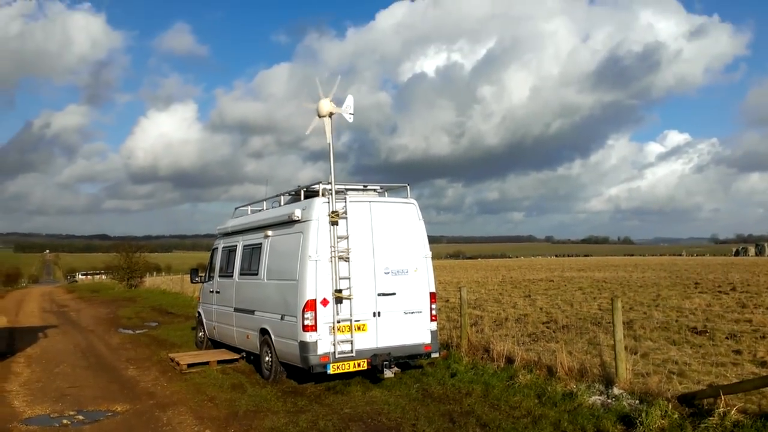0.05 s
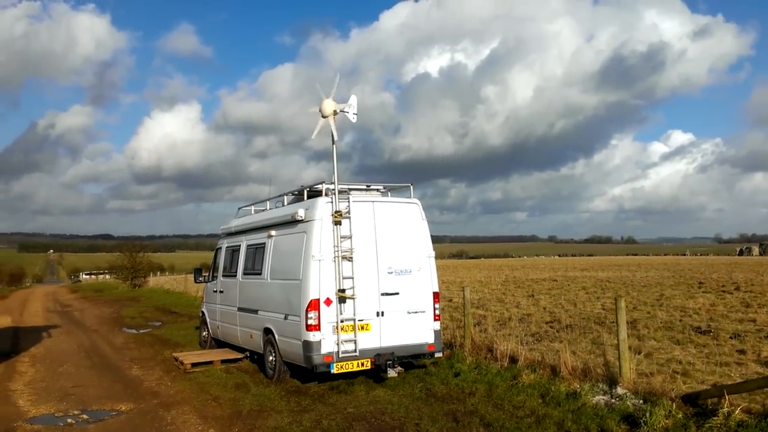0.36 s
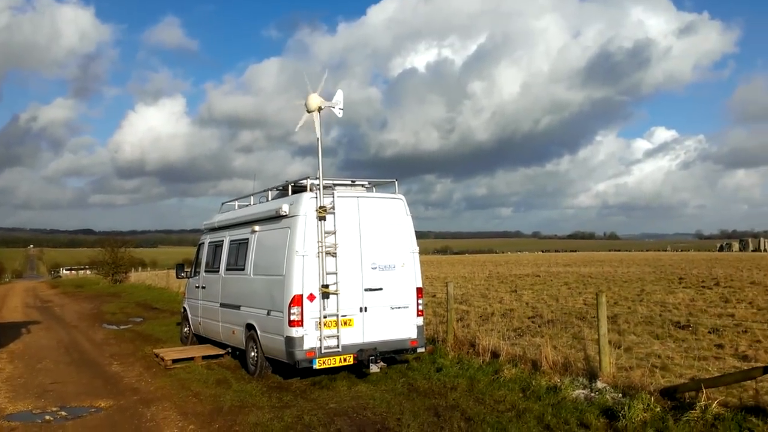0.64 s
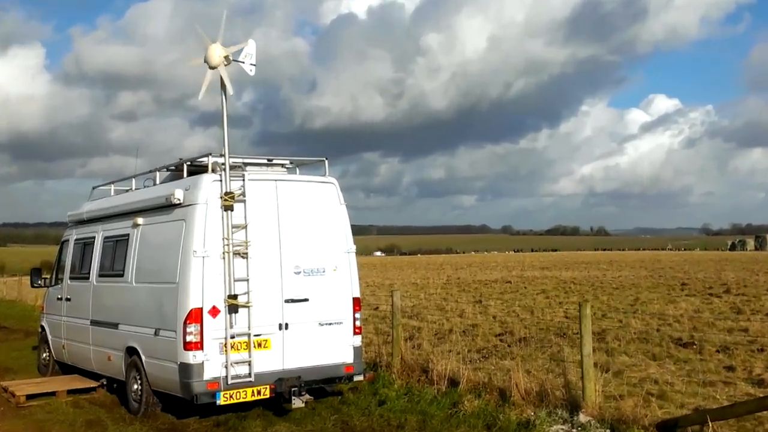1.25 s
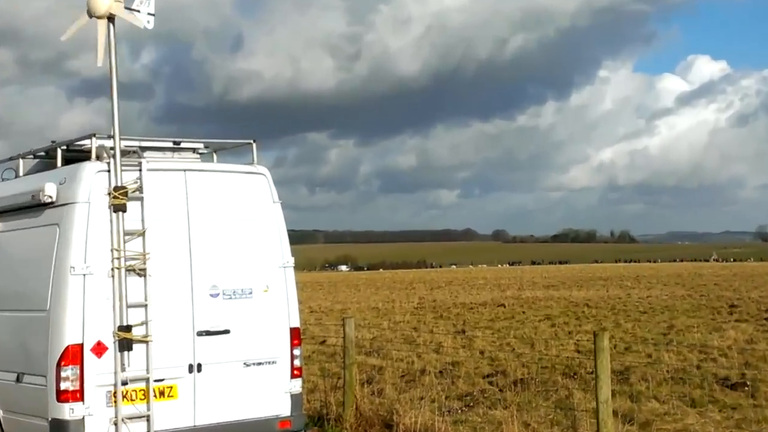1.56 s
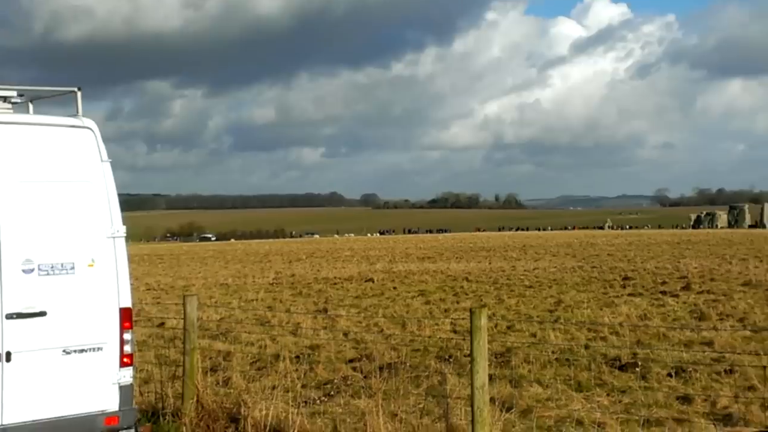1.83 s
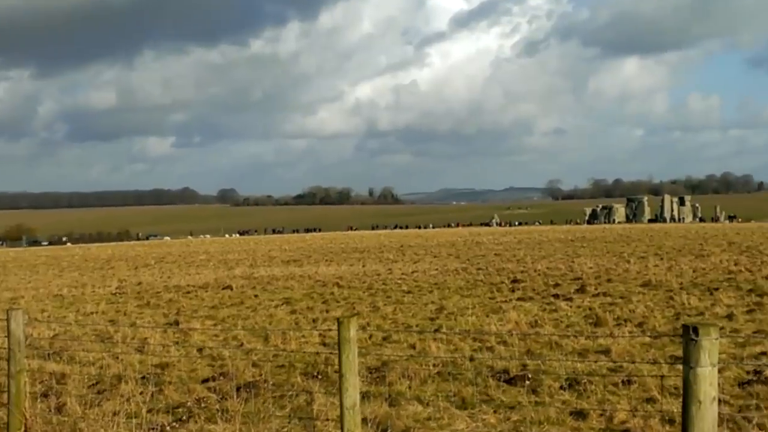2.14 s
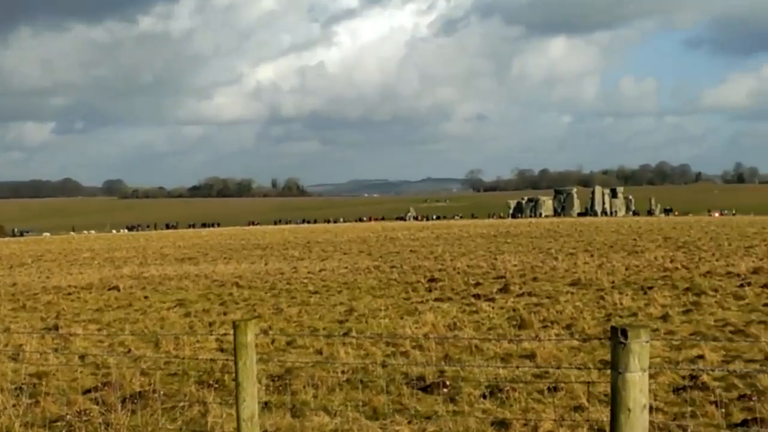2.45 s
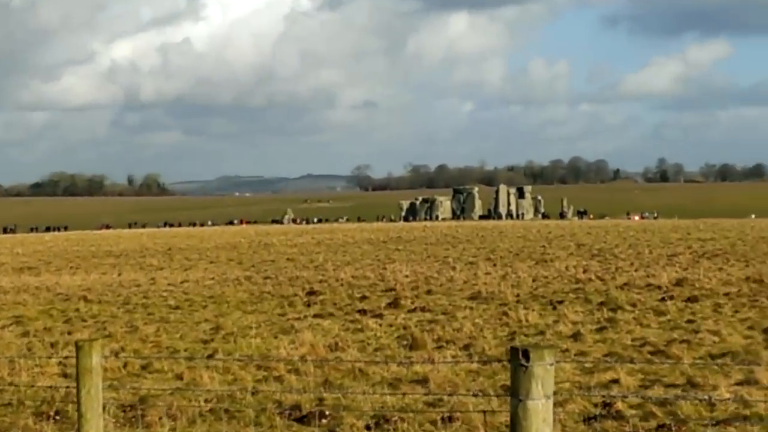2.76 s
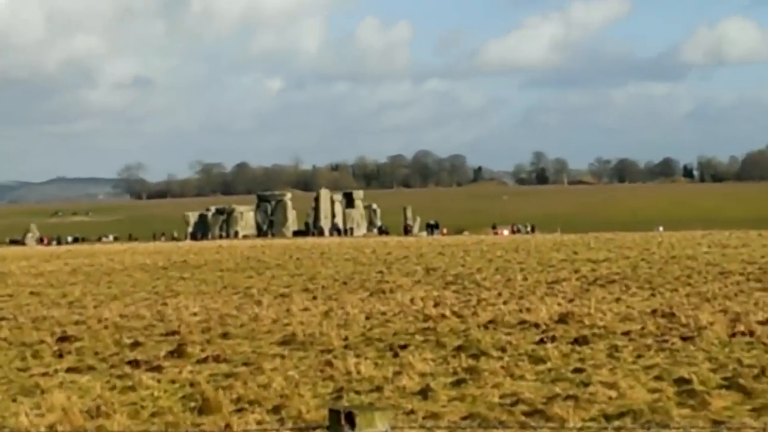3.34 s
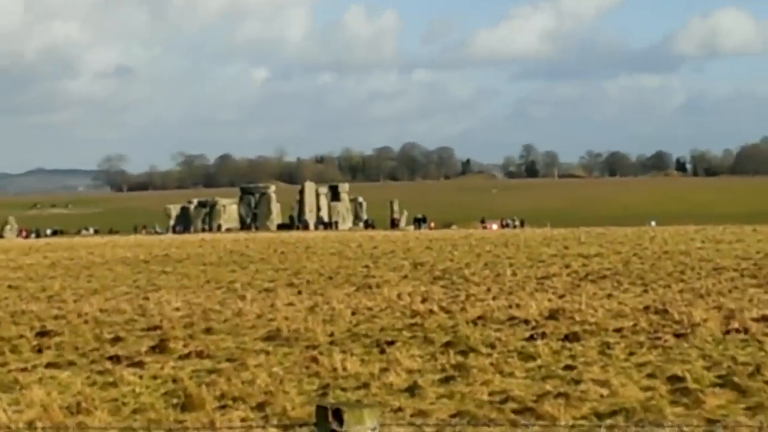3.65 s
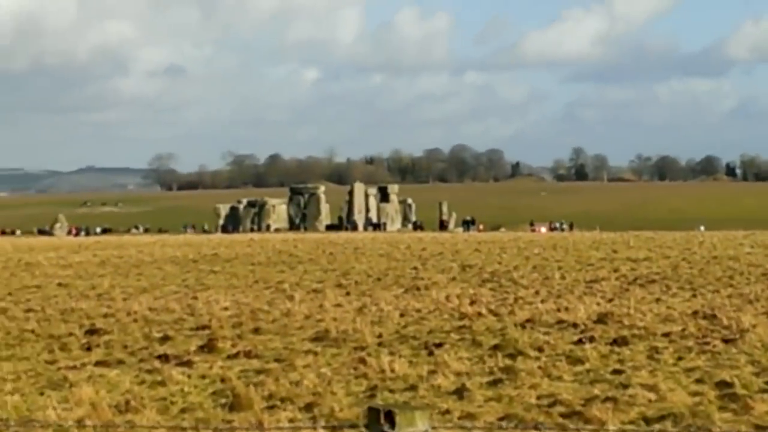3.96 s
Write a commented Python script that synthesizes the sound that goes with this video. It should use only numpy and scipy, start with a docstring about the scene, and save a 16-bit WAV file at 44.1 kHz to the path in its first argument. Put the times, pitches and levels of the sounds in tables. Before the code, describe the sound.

Wind rumbles and pops on the microphone outdoors, blowing steadily at first, then in short harsh gusts with lulls between. A soft rush of air and light ticks from the hand-held camera lie underneath.

```python
"""Gusty wind buffets the microphone of a hand-held camera in an open field.
Eddies flutter over the port; the harder they blow, the brighter and harsher they sound, until
the capsule overloads. Single large eddies pop on the port, and dull thuds underlie hard gusts.
Air rushes, dry grass rustles faintly, the casing ticks in the hand and fingers scrape on it.
The gain control ducks everything, hiss included, under the gusts."""
import sys
import numpy as np
from scipy import signal
from scipy.fft import rfft, irfft, next_fast_len
from scipy.io import wavfile
from scipy.ndimage import map_coordinates

SR = 44100
rng = np.random.default_rng(int(sys.argv[2]) if len(sys.argv) > 2 else 0)


def output_pcm(signal):
    """Save a mono or channel-first signal as 16-bit PCM at the path in sys.argv[1].

    Samples are clipped to [-1, 1] before scaling.
    """
    pcm = np.clip(np.atleast_2d(signal).T, -1, 1) * 32767
    wavfile.write(sys.argv[1], SR, np.round(pcm).astype(np.int16))


N = 176400


def amp(db):
    """Decibels to gain."""
    return 10 ** (np.asarray(db) / 20)


def unit_rms(x):
    """Scale to rms 1."""
    return x / np.sqrt(np.mean(x ** 2) + 1e-20)


def log_interp(points, hz):
    """Interpolate (frequency [Hz], value) points on a log axis."""
    knots_hz, values = np.transpose(points)
    return np.interp(np.log(hz + 1), np.log(knots_hz + 1), values)


def curve(points):
    """Interpolate (time [s], value) points at every sample."""
    return np.interp(np.arange(N) / SR, *np.transpose(points))


def wobble(rate_hz):
    """Smooth random curve, rate_hz knots a second."""
    return map_coordinates(rng.standard_normal(N // 10), [np.arange(N) * rate_hz / SR], mode="mirror")


def filtered(x, response):
    """Zero-phase filter of gain response(hz)."""
    size = next_fast_len(N + SR // 2)
    return irfft(rfft(x, size) * response(np.fft.rfftfreq(size, 1 / SR)), size)[:N]


def butterworth(x, hz, kind, order):
    """Causal low-pass or high-pass."""
    return signal.sosfilt(signal.butter(order, hz, kind, fs=SR, output="sos"), x)


def noise(spectrum):
    """Coloured noise of rms 1."""
    return unit_rms(filtered(rng.standard_normal(N), lambda hz: amp(log_interp(spectrum, hz))))


def running_rms(x, window_s):
    """Rms under a centred Gaussian window."""
    power = filtered(x ** 2, lambda hz: np.exp(-(hz * window_s) ** 2))
    return np.sqrt(np.abs(power) + 1e-12)


# wind between gusts (time [s], level [dB])
WIND_DB = [(0, -23), (.08, -24.5), (.17, -25), (.31, -27.5), (.42, -30), (.53, -25), (.65, -24.5),
           (.72, -25.5), (.84, -21), (.9, -22.5), (1.03, -20.5), (1.065, -27), (1.14, -20), (1.21, -24.5),
           (1.29, -33), (1.36, -34), (1.44, -40), (1.49, -30.5), (1.55, -40), (1.68, -29), (1.8, -29),
           (1.9, -30), (2.05, -32), (2.22, -28), (2.45, -26.5), (2.6, -29.5), (2.68, -40.5), (2.76, -43),
           (2.83, -22.5), (2.9, -26), (3.03, -23.5), (3.13, -30.5), (3.25, -40.5), (3.31, -32),
           (3.38, -50.5), (3.44, -30), (3.49, -49), (3.55, -37), (3.6, -57), (3.73, -44), (3.8, -34.5),
           (3.9, -30.5), (4, -34.5)]
# gusts on the port (start [s], length [s], level [dB])
PORT_GUSTS = [(0.129, 0.033, -23.5), (0.203, 0.006, -19.5), (0.287, 0.0087, -18), (0.346, 0.014, -21),
              (0.59, 0.012, -22), (0.828, 0.013, -14), (0.923, 0.026, -20.5), (0.991, 0.033, -21),
              (1.106, 0.015, -16), (1.194, 0.017, -18.5), (1.233, 0.0057, -23), (1.331, 0.017, -23.5),
              (1.403, 0.013, -26), (1.826, 0.013, -12.5), (1.854, 0.0084, -12), (1.87, 0.0232, -14),
              (2.16, 0.005, -25), (2.25, 0.014, -18), (2.339, 0.015, -24), (2.488, 0.008, -25),
              (2.775, 0.007, -24.5), (2.92, 0.0058, -13), (2.934, 0.012, -16), (2.951, 0.027, -13.5),
              (2.994, 0.011, -19.5), (3.063, 0.021, -23), (3.279, 0.018, -25.5), (3.333, 0.021, -26.5),
              (3.533, 0.014, -26), (3.675, 0.038, -31), (3.787, 0.0083, -25.5), (3.898, 0.023, -26.5)]
GUST_RISE_S, GUST_FALL_S = 0.0017, 0.0044
FLUTTER_DB, FLUTTER_HZ = 6, 84.6
SMALL_EDDY_DB, SMALL_EDDY_HZ = 3, 348.4


def flow_db():
    """Flow at the port: fluttering wind, gusts that rise, hold and fall, and small eddies."""
    t = np.arange(N) / SR
    power = amp(curve(WIND_DB) + FLUTTER_DB * np.tanh(wobble(FLUTTER_HZ))) ** 2
    for start_s, length_s, db in PORT_GUSTS:
        before = np.maximum(start_s - t, 0) / GUST_RISE_S
        after = np.maximum(t - start_s - length_s, 0) / GUST_FALL_S
        power += (amp(db) * np.exp(-np.minimum(before + after, 20))) ** 2
    return 10 * np.log10(power) + SMALL_EDDY_DB * np.tanh(wobble(SMALL_EDDY_HZ))


# turbulence at nominal flow (frequency [Hz], relative density [dB])
BUFFET_SPECTRUM = [(25, -37), (55, -7), (80, -2.5), (110, -3), (190, 0.5), (300, 1.5), (500, -2),
                   (700, -10.5), (1000, -20.5), (1500, -37.5), (2400, -50), (3200, -59.5), (6000, -57),
                   (16000, -100)]
# band growth with flow (centre [Hz], slope [dB/dB])
BAND_GROWTH = [(160, 0.84), (340, 0.98), (600, 1.1931), (1200, 2), (2400, 2.5)]
# lowest band's trim (time [s], gain [dB])
BASS_TRIM_DB = [(0, -4.5), (1.2, -2.5), (1.8, 0.5), (3.3, 3.5), (4, 0.5)]
NOMINAL_DB, CHOKE_ABOVE_NOMINAL_DB = -25, 18


def buffeting():
    """Turbulence whose upper bands grow fastest with the flow, until the port chokes."""
    eddies = noise(BUFFET_SPECTRUM)
    eddies /= running_rms(eddies, window_s=0.012)
    drive_db = np.minimum(flow_db() - NOMINAL_DB, CHOKE_ABOVE_NOMINAL_DB)
    centres_hz, slopes = np.transpose(BAND_GROWTH)
    bands = []
    for weights, slope in zip(np.eye(len(slopes)), slopes):
        band = filtered(eddies, lambda hz: log_interp(np.c_[centres_hz, weights], hz))
        bands.append(band * amp(NOMINAL_DB + slope * drive_db))
    return bands[0] * amp(curve(BASS_TRIM_DB)) + sum(bands[1:])


OVERLOAD_DB, ASYMMETRY = -3, 0.32
PORT_CUTOFF_HZ, BASS_CUT_HZ, BASS_LEAK_DB = 2900, 139, -19


def microphone(pressure):
    """The capsule saturates, yielding more one way; the narrow port muffles; most deep bass is shed."""
    swing = np.tanh(pressure / amp(OVERLOAD_DB))
    lopsided = amp(OVERLOAD_DB) * (swing + ASYMMETRY * swing ** 2)
    muffled = butterworth(lopsided, PORT_CUTOFF_HZ, "low", order=4)
    return butterworth(muffled, BASS_CUT_HZ, "high", order=3) + amp(BASS_LEAK_DB) * muffled


# airy rush (time [s], level [dB])
RUSH_DB = [(0, -45.5), (.2, -37.5), (.42, -52), (.65, -38.5), (.85, -33), (1.2, -43.5), (1.3, -53.5),
           (1.47, -48), (1.56, -55), (1.8, -47), (2.2, -58), (2.5, -51.5), (2.7, -55), (2.95, -42.5),
           (3.2, -57.5), (3.6, -58), (4, -57)]
# airy rush (frequency [Hz], relative density [dB])
RUSH_SPECTRUM = [(30, -11.5), (200, -6), (700, 9), (1400, 0), (2300, -12.5), (3000, -20), (5000, -32),
                 (16000, -67)]
RUSH_FLUTTER_DB = 0.6


def air_rush():
    """Air rushes past behind the buffeting."""
    return noise(RUSH_SPECTRUM) * amp(curve(RUSH_DB) - RUSH_FLUTTER_DB * wobble(rate_hz=47))


# rustle (time [s], level [dB])
GRASS_DB = [(0, -68), (.5, -61.5), (.9, -72.5), (1.3, -65.5), (1.47, -61), (1.62, -64.5), (2.3, -67),
            (2.7, -69), (3.3, -68.5), (3.6, -71.5), (3.72, -66), (4, -67.5)]
# rustle (frequency [Hz], relative density [dB])
GRASS_SPECTRUM = [(200, -7), (1500, 4.5), (2900, 5), (3600, 3), (4100, 3), (4600, 5), (5200, -1),
                  (6000, -14), (9000, -28), (16000, -35)]
GRASS_FLUTTER_DB = 3.5


def grass_rustle():
    """Dry grass flutters in the wind."""
    return noise(GRASS_SPECTRUM) * amp(curve(GRASS_DB) + GRASS_FLUTTER_DB * wobble(rate_hz=38))


# large eddies (time [s], envelope peak [dB], pitch [Hz])
EDDY_POPS = [(.03, -12.5, 570), (.047, -9, 476), (.133, -21, 520), (.265, -9, 570), (.29, -18.5, 970),
             (.353, -13, 563), (.391, -6, 510), (.49, -12.5, 600), (.559, -11.5, 583), (.595, -10.5, 540),
             (.676, -10, 457), (.759, -12, 600), (.82, -8, 540), (.841, -7.5, 1610), (.885, -10.5, 850),
             (.937, -8.5, 450), (.995, -9.5, 537), (1.026, -7.5, 607), (1.108, -11, 460),
             (1.12, -6.5, 1250), (1.174, -15, 460), (1.209, -20, 480), (1.234, -19.5, 600),
             (1.271, -18.5, 430), (1.336, -12.5, 490), (1.648, -13, 328), (1.715, -13.5, 400),
             (1.824, -4, 890), (1.837, -1, 1530), (1.887, -6.5, 990), (1.894, -7, 650), (1.914, -7.5, 447),
             (2.158, -16, 470), (2.248, -7.5, 530), (2.256, -18, 1100), (2.268, -4, 404),
             (2.298, -12.5, 550), (2.344, -9, 377), (2.419, -8.5, 544), (2.466, -13.5, 555),
             (2.56, -9.5, 543), (2.652, -17, 470), (2.777, -13, 342), (2.852, -10, 760), (2.928, -3.5, 524),
             (2.944, -4, 330), (2.961, -13, 1500), (3.074, -9.5, 750), (3.082, -4, 435), (3.112, -6.5, 450),
             (3.21, -15, 410), (3.286, -8, 382), (3.307, -20, 490), (3.829, -18, 730), (3.924, -12, 530)]
POP_WIDTH_CYCLES = 0.31


def eddy_pops():
    """Each large eddy slaps the port with about one swing of pressure."""
    out, t = np.zeros(N), np.arange(N) / SR
    for time_s, db, hz in EDDY_POPS:
        cycles = np.clip((t - time_s) * hz, -10, 10)
        swing = np.sin(2 * np.pi * (cycles + rng.random()))
        out += amp(db) * swing / np.cosh(cycles / POP_WIDTH_CYCLES)
    return out


# handling ticks (time [s], click peak [dB], snap re click [dB], knock re click [dB])
CASING_TICKS = [(0.562, -43, -20, -7), (0.785, -38.5, -2, -4), (0.84, -33, -4, 18),
                (0.868, -45, -1.5, -13.5), (0.915, -43, -3, -10), (1.021, -45, -3, -13),
                (1.219, -32, -3.5, 8), (1.677, -48.5, 1, -14), (1.838, -22.5, -19, -14),
                (2.433, -48, -26, -7), (2.849, -26, -44, 10), (2.961, -36.5, -19, -4),
                (3.669, -44.5, -1.5, -22), (3.712, -54, 4, -20), (3.76, -47.5, 5, -20)]
# tick parts (frequency [Hz], relative density [dB])
CLICK_SPECTRUM = [(300, -26), (2000, -8), (3200, 8.5), (4400, 6.5), (5100, -2.5), (5700, -27.5),
                  (9000, -35.5), (16000, -62.5)]
SNAP_SPECTRUM = [(300, -12.5), (5000, 7), (9000, -2.5), (16000, -18)]
KNOCK_SPECTRUM = [(30, -34), (300, 3), (1000, 9), (2300, -9.5), (3000, -21), (6000, -50.5), (16000, -82)]
CLICK_T60_S, SNAP_T60_S, KNOCK_T60_S, TICK_RISE_S = 0.018, 0.0078, 0.014, 0.0002
RING_END_HZ, RING_GLIDE_HZ, RING_GLIDE_S = 3890, 1670, 0.0016
RING_RE_CLICK_DB, RING_RISE_S, RING_T60_S = -7.5, 0.00077, 0.017


def casing_ticks():
    """The casing ticks in the hand: dry click, sharp snap, hollow knock and a brief sinking ring."""
    out, t = np.zeros(N + SR), np.arange(SR // 20) / SR
    parts = [(noise(CLICK_SPECTRUM), CLICK_T60_S),
             (noise(SNAP_SPECTRUM), SNAP_T60_S),
             (noise(KNOCK_SPECTRUM), KNOCK_T60_S)]
    rise = 1 - np.exp(-(t / TICK_RISE_S) ** 2)
    ring_hz = RING_END_HZ + RING_GLIDE_HZ * np.exp(-t / RING_GLIDE_S)
    ring_rise = 1 - np.exp(-(t / RING_RISE_S) ** 2)
    ring_decay = amp(RING_RE_CLICK_DB - 60 * t / RING_T60_S)
    ring = np.sin(2 * np.pi * np.cumsum(ring_hz) / SR) * ring_rise * ring_decay
    for time_s, click_db, snap_db, knock_db in CASING_TICKS:
        start = round(time_s * SR)
        span = slice(start, start + len(t))
        out[span] += amp(click_db) * ring
        for (grain, t60_s), part_db in zip(parts, (0, snap_db, knock_db)):
            burst = grain[span] * rise * amp(-60 * t / t60_s)
            out[span] += amp(click_db + part_db) * burst / np.abs(burst).max()
    return out[:N]


# finger scrapes (centre [s], half length [s], level [dB])
FINGER_SCRAPES = [(0.857, 0.09, -60.5), (1.834, 0.01, -50), (2.845, 0.036, -59.5), (2.953, 0.014, -56.5)]
# friction (frequency [Hz], relative density [dB])
SCRAPE_SPECTRUM = [(300, -22.5), (2000, -14.5), (3200, 0), (4800, 8.5), (5600, 0), (6500, -12.5),
                   (9000, -19.5), (16000, -35)]
SCRAPE_GRAIN_DB, SCRAPE_GRAIN_HZ = 3.5, 400


def finger_scrapes():
    """Fingers stick and slip on the casing in brief grainy swells."""
    t = np.arange(N) / SR
    swells = sum(amp(db) * np.exp(-((t - centre_s) / half_s) ** 2)
                 for centre_s, half_s, db in FINGER_SCRAPES)
    friction = noise(SCRAPE_SPECTRUM) * amp(SCRAPE_GRAIN_DB * wobble(SCRAPE_GRAIN_HZ))
    return swells * unit_rms(friction)


# thuds under hard gusts (time [s], peak [dB])
GUST_THUDS = [(.841, -35), (1.836, -45), (2.262, -43), (2.926, -36), (2.972, -35)]
THUD_HZ, THUD_WIDTH_S = 48, 0.005


def gust_thuds():
    """Each thud is one slow push on the capsule."""
    out, t = np.zeros(N), np.arange(N) / SR
    for time_s, db in GUST_THUDS:
        envelope = amp(db) / np.cosh(np.clip((t - time_s) / THUD_WIDTH_S, -20, 20))
        out += envelope * np.cos(2 * np.pi * THUD_HZ * (t - time_s))
    return out


def scene():
    """Wind, field and handling in mono; only buffeting and pops overload the capsule."""
    wind = microphone(buffeting() + eddy_pops())
    return (wind + air_rush() + grass_rustle() + casing_ticks() + finger_scrapes() + gust_thuds())[None]


# camera hiss (time [s], level [dB])
HISS_DB = [(0, -68.5), (1.15, -67.5), (1.26, -66), (1.6, -65.5), (1.85, -66), (2.1, -66), (2.3, -67),
           (2.7, -66.5), (3.08, -66), (3.2, -64.5), (3.38, -67), (3.46, -63.5), (3.62, -72), (3.72, -66),
           (3.9, -67.5), (4, -63)]
# camera hiss (frequency [Hz], relative density [dB])
HISS_SPECTRUM = [(30, 5.5), (3000, -2), (7000, 1.5), (12000, -0.5), (16000, 1)]
AGC_THRESHOLD_DB, AGC_CUT_DB_PER_DB, AGC_WINDOW_S = -29.5, 0.27, 0.054
BAND_LIMIT_HZ = 15750


def record(dry):
    """The camera adds hiss, turns the gain down under gusts and cuts all above its band limit."""
    x = dry[0] + amp(curve(HISS_DB)) * noise(HISS_SPECTRUM)
    excess = np.maximum(running_rms(x, AGC_WINDOW_S) / amp(AGC_THRESHOLD_DB), 1)
    ducked = x * excess ** -AGC_CUT_DB_PER_DB
    return filtered(ducked, lambda hz: hz < BAND_LIMIT_HZ)[None]


dry = scene()
out = record(dry)
output_pcm(out)
```